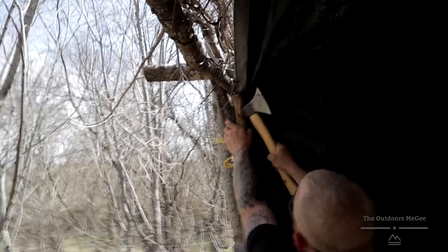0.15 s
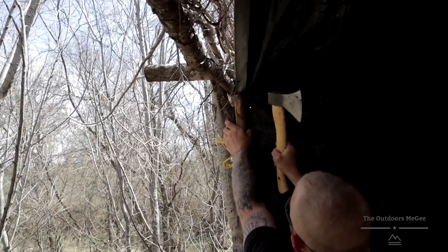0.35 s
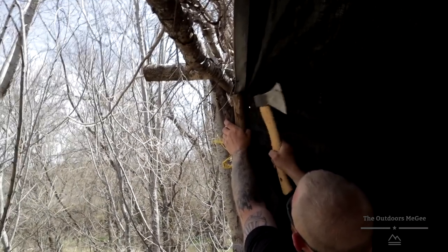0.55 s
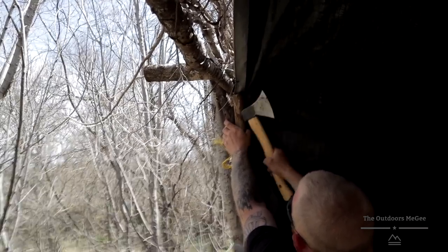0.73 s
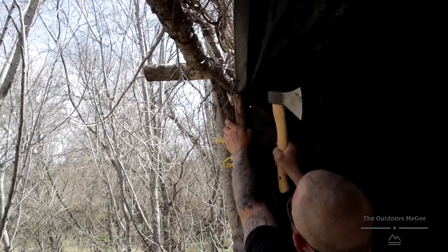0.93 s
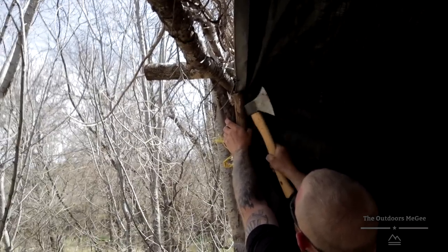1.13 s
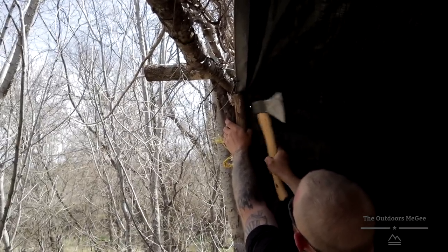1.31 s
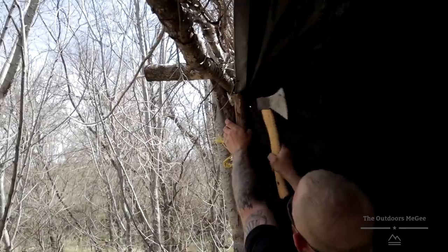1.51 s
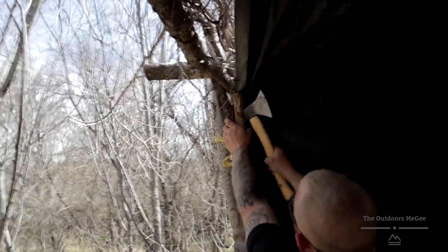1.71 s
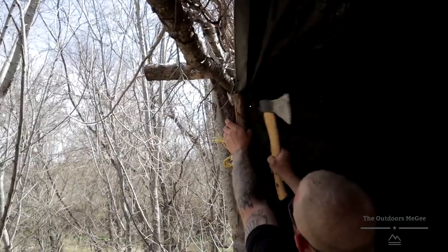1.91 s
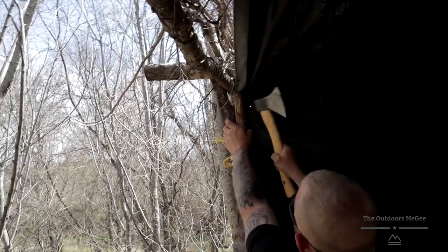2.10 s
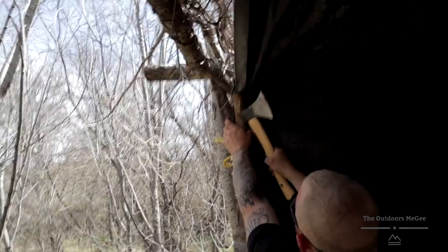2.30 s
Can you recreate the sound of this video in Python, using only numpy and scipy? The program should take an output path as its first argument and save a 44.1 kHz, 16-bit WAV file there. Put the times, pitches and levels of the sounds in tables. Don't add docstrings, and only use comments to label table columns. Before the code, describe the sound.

Seven sharp hammer blows of a hatchet back on a nail in a log post, about three a second, each with woody thump, stick rattle and short echoes; light breeze behind, close stereo microphone, slightly clipped.

```python
import sys
import numpy as np
from scipy import signal
from scipy.io import wavfile
from scipy.ndimage import uniform_filter1d

SR = 44100
rng = np.random.default_rng(int(sys.argv[2]) if len(sys.argv) > 2 else 0)


def undo_db(level):
    steps = np.asarray(level, float) / 20
    return 10 ** steps


def wav_record(signal):
    frames = np.transpose(np.atleast_2d(signal))
    bounded = np.clip(frames, -1, 1)
    quanta = np.round(bounded * 32767).astype(np.int16)
    wavfile.write(sys.argv[1], SR, quanta)


N = 103635
PAD, SPAN = SR // 5, SR * 3 // 5
LEAD_S = .002
BANDS_HZ = 28 * 2 ** np.arange(0, 9.2, 1 / 3)


def blow(crack_db, thump_db, wood_db, far_db, struck_db):
    t = np.arange(SPAN) / SR - LEAD_S
    bounce = undo_db(-14) * crack_noise(late_s=.0028, t60=.025)
    crack = early_knock(t) + snap(t) + undo_db(-5) * crack_noise(late_s=0, t60=.009) + bounce
    near = undo_db(crack_db) * crack + undo_db(wood_db) * push(t)
    near = near + undo_db(thump_db) * thump(t) + undo_db(wood_db - 11) * timber(t)
    far = trees() + echoes(near, t)
    return near + undo_db(wood_db) * rattle() + undo_db(far_db) * far + steel(t, struck_db)


def early_knock(t):
    hz = 2100
    since = t + LEAD_S
    return undo_db(-9) * ports(mode(since, hz, .02) * (1 - fade(since, .006)), 0, hz, 1)


def snap(t):
    hz = 2300
    return ports(mode(t - .0003, hz, .003), 0, hz, 1)


def crack_noise(late_s, t60):
    # frequency in Hz, level in dB per Hz.
    crack_colour = [(180, -29), (300, -6), (1530, -12.5), (3760, -11), (5900, -24.5), (7200, -12.5),
                    (8220, -28.5), (11100, -13.5), (16000, -49)]
    t60_table = [(300, t60), (15000, t60)]
    return scatter(4096, late_s, crack_colour, t60_table, rise_s=.0002, grain_db=2, first=16)


def push(t):
    hz, floor_hz = 450, 130
    bump = undo_db(15) * ports(mode(t - .0006, hz, .011), 0, hz, 1)
    return signal.lfilter(*signal.butter(2, floor_hz, "high", fs=SR), bump)


def thump(t):
    # delay in seconds, frequency in Hz, sign, level in dB, t60 in seconds.
    thump_modes = [(.0016, 190, -1, 19, .014), (.003, 62, 1, 14, .05)]
    out = 0
    for delay_s, hz, sign, db, t60 in thump_modes:
        out = out + sign * undo_db(db) * ports(mode(t - delay_s, hz, t60), 0, hz, -1)
    return out


def timber(t):
    # frequency in Hz, level in dB, t60 in seconds.
    wood_modes = [(215, -1, .2), (290, -7, .12), (350, -15, .12), (480, -2.5, .1), (595, -0.5, .1),
                  (680, -12, .09), (1090, 3.5, .11), (1330, -4, .09), (1490, -6.5, .09), (1750, -4, .09),
                  (2160, 0, .1), (2640, -2.5, .1), (3700, -8, .1)]
    spread, scatter_db = .02, 1.5
    out = 0
    for hz, db, t60 in wood_modes:
        size, split, one, two = rng.standard_normal(size=4)
        low = mode(t, hz * (1 - spread * split), t60, np.pi * one)
        high = mode(t, hz * (1 + spread * split), t60, np.pi * two)
        pair = ports(low + .5 * high, high, hz, np.sign(one))
        out = out + undo_db(db + scatter_db * size) * pair
    return out * (1 - fade(t, .01))


def steel(t, struck_db):
    # frequency in Hz, t60 in seconds.
    head_modes = [(2638, .25), (5136, 1.2), (8979, .45), (13250, .2), (13860, .2)]
    out = 0
    for (hz, t60), db in zip(head_modes, struck_db):
        swing_db = 5 * walk(SPAN, .05)
        out = out + undo_db(db + swing_db) * ports(mode(t, hz, t60), 0, hz, 1)
    return out


def rattle():
    # frequency in Hz, level in dB per Hz.
    rattle_colour = [(59, -29.5), (100, -10.5), (210, -6), (1060, -5), (3780, -14), (8110, -25),
                     (11400, -20), (13800, -28), (16000, -69)]
    # frequency in Hz, t60 in seconds.
    rattle_t60 = [(100, .2), (400, .16), (1500, .13), (5000, .12), (14000, .11)]
    return undo_db(-5) * scatter(SR // 3, 0, rattle_colour, rattle_t60, rise_s=.002, grain_db=3.5)


def trees():
    # frequency in Hz, level in dB per Hz.
    trees_colour = [(59, -35.5), (100, -8.5), (289, -9), (621, -18), (991, -10.5), (4670, -19), (5300, -19),
                    (11400, -29), (16000, -68)]
    # frequency in Hz, t60 in seconds.
    trees_t60 = [(100, .7), (1000, .6), (5000, .5), (14000, .35)]
    return undo_db(-30) * scatter(SPAN, 0, trees_colour, trees_t60, rise_s=.02, grain_db=2.5)


def echoes(near, t):
    # delay in seconds, level in dB.
    echo_taps = [(.1195, -13), (.146, -15)]
    dull = signal.lfilter(*signal.butter(2, 600, fs=SR), near * fade(t, .03))
    return sum(undo_db(db) * np.roll(dull, int(lag_s * SR), axis=1) for lag_s, db in echo_taps)


def knock(db, hz):
    t = np.arange(SPAN) / SR
    tap = mode(t, hz, 7 / hz + .012) + .5 * mode(t, 1.19 * hz, .015)
    return undo_db(db) * ports(tap, 0, hz, 1)


def air():
    # frequency in Hz, level in dB per Hz.
    air_colour = [(15, -33), (25, 0.5), (256, -9), (734, -17), (818, -10), (1230, -21), (4870, -31.5),
                  (5280, -32.5), (16000, -45)]
    # time in seconds, level in dB.
    breeze_db = [(0, -53), (.5, -54.5), (1.0, -58), (1.6, -59.5), (2.35, -60.5)]
    # time in seconds, level in dB.
    rumble_db = [(0.0, -50.5), (0.66, -54), (1.56, -58.5), (1.98, -57.5), (2.35, -61.5)]
    breeze, rumble = 0, 0
    for hz in BANDS_HZ:
        a, b = band(rng.standard_normal((2, N)), hz)
        tilt_db = -.7 * np.log2(hz / 1000)
        flicker_db = 2.5 * walk(N, .04)
        part = undo_db(at(air_colour, hz) + tilt_db + flicker_db) * ports(a, b, hz, 1)
        if hz > 120:
            breeze = breeze + part
        else:
            rumble = rumble + part
    t = np.arange(N) / SR
    breeze_gain = undo_db(np.interp(t, *np.array(breeze_db).T))
    rumble_gain = undo_db(np.interp(t, *np.array(rumble_db).T))
    return breeze_gain * breeze / breeze.std() + rumble_gain * rumble / rumble.std()


def scatter(size, late_s, colour, t60, rise_s, grain_db, first=4):
    t = np.arange(size) / SR - LEAD_S - late_s
    grain = undo_db(grain_db * walk(size, .0015)) * (1 - fade(t, 7 * rise_s))
    out = 0
    for hz in BANDS_HZ[first:]:
        noise = rng.standard_normal((2, size)) * grain * fade(t, at(t60, hz))
        a, b = band(noise, hz)
        level = undo_db(at(colour, hz) + 1.5 * rng.standard_normal())
        out = out + level * ports(a, b, hz, rng.choice([-1, 1]))
    return np.pad(unit(out), [(0, 0), (0, SPAN - size)])


def mode(t, hz, t60, phase=0):
    return fade(t, t60) * -1j * np.exp(1j * (2 * np.pi * hz * t + phase))


def ports(a, b, hz, sign):
    # frequency in Hz, turn in radians.
    port_turn = [(60, .2), (250, .9), (700, .9), (3000, 1.0), (9000, 1.7), (14000, 1.1)]
    # frequency in Hz, unshared part as a ratio.
    port_apart = [(60, .1), (500, .35), (3000, .45), (14000, .35)]
    # frequency in Hz, left minus right in dB.
    port_lean = [(60, -1.0), (110, -1.0), (200, 0.0), (380, 1.0), (700, 0.0), (1290, 0.5), (2380, -1.5),
                 (4400, -1.0), (8120, -1.0), (15000, 1.0)]
    unshared = np.clip(at(port_apart, hz), 0, 1)
    turn = np.exp(1j * sign * at(port_turn, hz) / 2) * undo_db(at(port_lean, hz) / 2)
    return np.real([turn * a + unshared * b, a / turn - unshared * b]) / np.sqrt(1 + unshared ** 2)


def band(x, hz):
    pole = np.exp((2j * np.pi * hz - np.pi * hz / 3) / SR)
    return signal.lfilter([(1 - abs(pole)) ** 2], np.poly([pole, pole]), x)


def fade(t, t60):
    return (t >= 0) * np.exp(-np.log(1000) * np.maximum(t, 0) / t60)


def walk(n, hold_s):
    hold = max(int(SR * hold_s), 1)
    steps = np.repeat(rng.standard_normal(n // hold + 1), hold)
    return 1.2 * uniform_filter1d(steps, hold)[:n]


def at(table, hz):
    table_hz, value = np.array(table).T
    return np.interp(np.log(hz), np.log(table_hz), value)


def unit(x):
    return x / np.sqrt(uniform_filter1d(np.mean(x ** 2, axis=0), SR // 100).max())


def scene():
    # start in seconds, then crack, thump, wood and far echoes in dB.
    earlier_blow = (-0.1937, 2, -30, -8, -9)
    # start in seconds, then levels of crack, thump, wood with rattle, and trees with echoes in
    # dB.
    blow_rows = [
        (.2007, -4.5, -23.5, -13.5, -12),
        (.515, -2.5, -36, -14, -13),
        (.8223, -3.5, -24, -14, -16),
        (1.1302, -4.5, -26, -15.5, -17.5),
        (1.4414, -3, -44, -15.5, -17.5),
        (1.7563, -2.5, -46, -15.5, -17.5),
        (2.053, -7.5, -49, -18, -18),
    ]
    # its five modes in dB, the earlier blow first.
    struck_rows = [(-66, -47, -64, -66, -66), (-66, -64, -64, -66, -66), (-66, -68, -66, -66, -66),
                   (-66, -68, -58, -58, -54), (-66, -68, -64, -44, -58), (-39, -62, -56, -34, -48),
                   (-66, -57, -50, -54, -58), (-66, -68, -50, -38, -47)]
    # start in seconds, level in dB, frequency in Hz.
    stick_taps = [(.006, -38, 900), (.08, -42.5, 320), (.175, -40, 190), (.241, -30, 300), (.293, -30, 250),
                  (.325, -38, 1050), (.406, -44.5, 330), (.719, -39.5, 300), (.8445, -19, 3800),
                  (.8595, -21, 3600), (1.787, -29, 3800)]
    out = np.zeros((2, PAD + N + SPAN))
    for (start_s, *levels_db), struck_db in zip([earlier_blow, *blow_rows], struck_rows):
        i = PAD + int((start_s - LEAD_S) * SR)
        out[:, i:i + SPAN] += blow(*levels_db, struck_db)
    for start_s, db, hz in stick_taps:
        i = PAD + int(start_s * SR)
        out[:, i:i + SPAN] += knock(db, hz)
    return out[:, PAD:PAD + N] + air()


def low_pass(x):
    return signal.sosfilt(signal.butter(12, 16480, fs=SR, output="sos"), x)


def record(dry):
    top_hz, full, clip = 13600, 1.5, .8
    soft = signal.sosfilt(signal.butter(6, top_hz, fs=SR, output="sos"), dry)
    mix = full * np.tanh(np.clip(soft / full, -clip, clip))
    return low_pass(mix)


dry = scene()
out = record(dry)
wav_record(out)
```